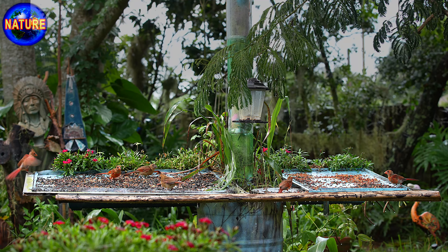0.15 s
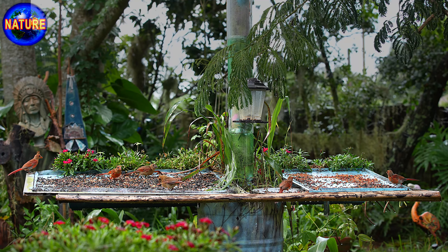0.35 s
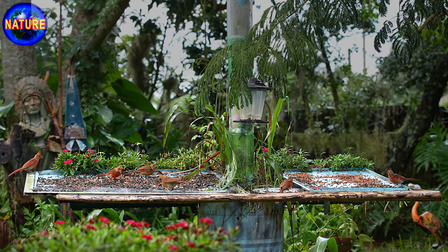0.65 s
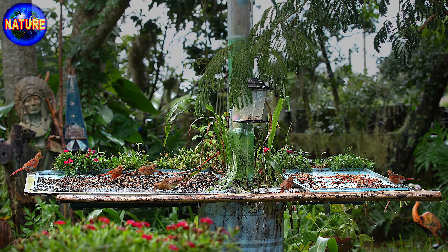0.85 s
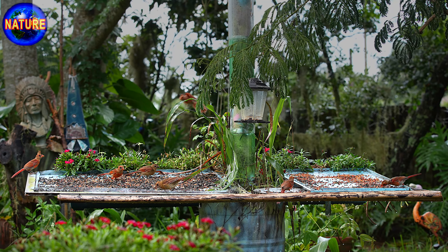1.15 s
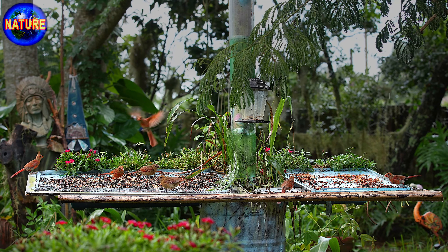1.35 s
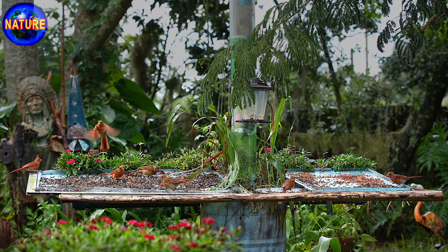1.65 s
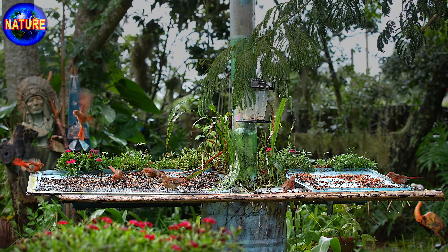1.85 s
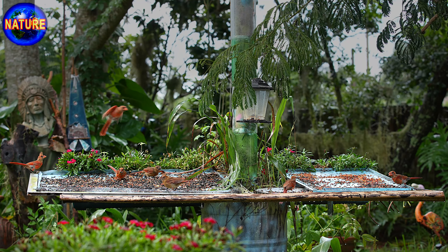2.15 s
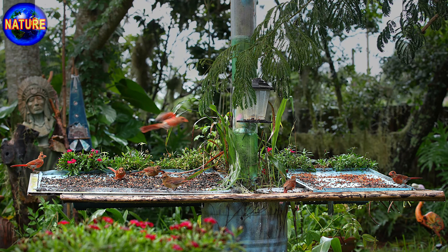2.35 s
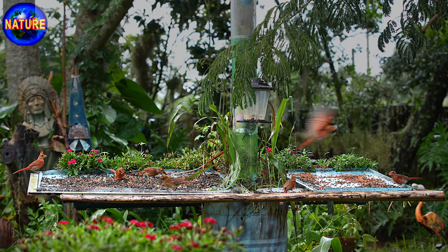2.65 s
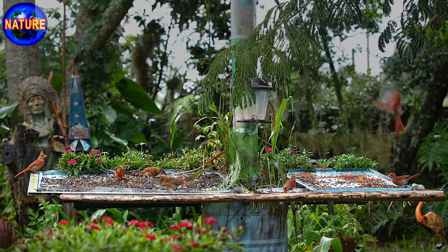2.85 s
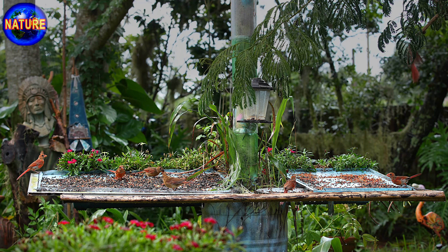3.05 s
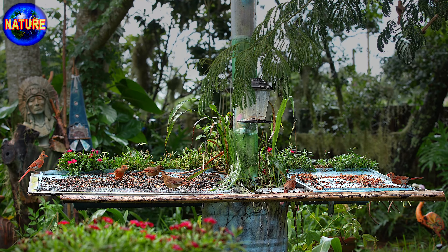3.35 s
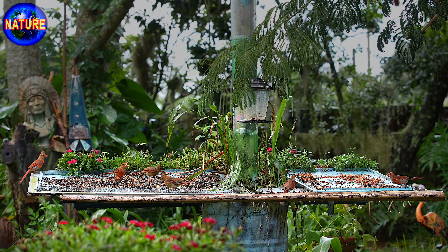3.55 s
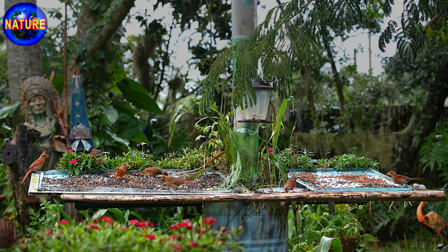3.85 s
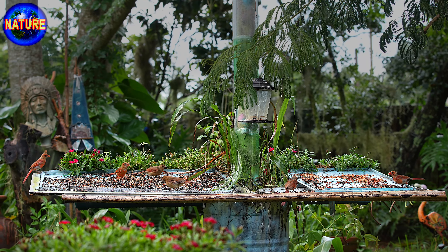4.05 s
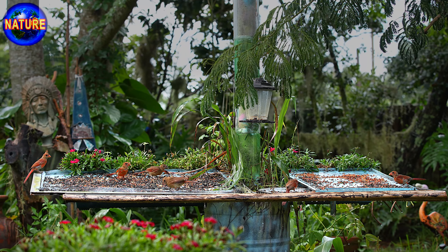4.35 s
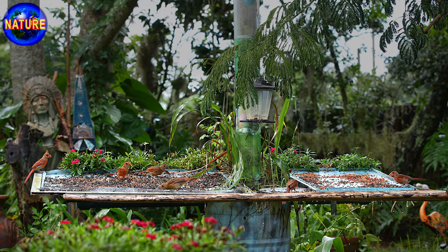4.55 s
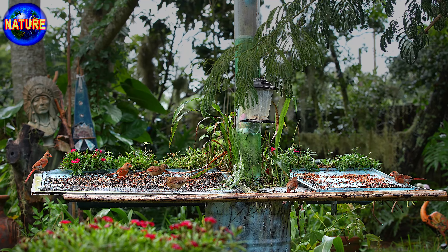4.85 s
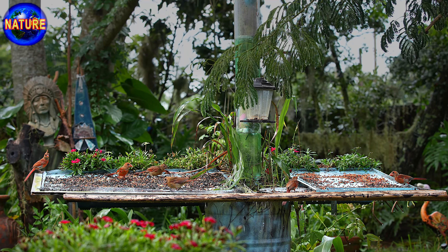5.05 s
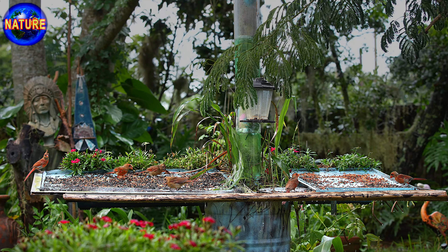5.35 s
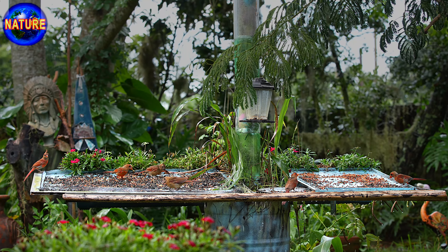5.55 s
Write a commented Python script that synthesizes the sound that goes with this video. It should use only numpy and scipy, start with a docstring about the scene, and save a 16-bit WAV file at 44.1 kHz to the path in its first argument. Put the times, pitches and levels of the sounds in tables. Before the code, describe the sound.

A stereo microphone in a leafy garden picks up constant fine dripping and a quiet hiss. A low engine throbs far off. A single bird starts with faint short whistles, grows louder with long upward sweeps, and finishes with rapid steep chips alternating with short rises, lightly echoed by trees and walls. Meanwhile the engine climbs in pitch and recedes; drips and small wind buffets remain.

```python
"""Songbird in a wet garden

A hiss of far traffic and trickling water is shaped noise; drips on leaves are noise snaps with ringing sines.
Light wind, as low noise and single swings, buffets the microphone pair.
A distant engine, a stack of sines on its firing rate, idles and then pulls away; faint hums come and go.
A songbird's gliding sines fall, rise and chip steeply; ground, trunks, walls and foliage echo them."""
import sys
import numpy as np
from scipy import signal
from scipy.fft import rfft, irfft
from scipy.io import wavfile
from scipy.ndimage import uniform_filter1d

SR = 44100
rng = np.random.default_rng(int(sys.argv[2]) if len(sys.argv) > 2 else 0)


def to_wav(sig):
    """Store sig (one row per channel, or 1-D mono) as 16-bit WAV at the path in sys.argv[1].

    Samples outside -1..1 are clipped; the rate is SR.
    """
    pcm = np.clip(np.atleast_2d(sig), -1, 1) * 32767
    pcm = np.round(pcm).astype(np.int16)
    wavfile.write(sys.argv[1], SR, pcm.T)  # frames by channels


N = 251811  # length in samples


def amp(db):
    """Turn decibels into a plain multiplier."""
    return 10 ** (np.asarray(db) / 20)


def evened(x):
    """Scale a signal to an average strength (rms) of 1."""
    return x / np.sqrt(np.mean(x ** 2) + 1e-20)


def read(points, hz):
    """Read a curve between its points, with pitch spaced as the ear hears it (log)."""
    f, value = np.transpose(points)
    return np.interp(np.log(hz + 1), np.log(f + 1), value)


def add(mix, s, sound):
    """Lay a sound into the mix at a time in seconds, cut off at the end."""
    part = mix[round(s * SR):][:len(sound)]
    part += sound[:len(part)]


def wander(top_hz):
    """Slow random drift of rms 1: noise with the changes faster than about top_hz faded out."""
    noise = rfft(rng.standard_normal(N))
    keep_slow = np.exp(-(np.fft.rfftfreq(N, 1 / SR) / top_hz) ** 2)
    return evened(irfft(noise * keep_slow, N))


# Colour of the hiss, both ports together: (frequency [Hz], relative level per Hz [dB])
HISS_COLOUR = [(18, -20), (30, -10), (58, -4.5), (110, -7.5), (220, -15), (480, -21), (1100, -23.5),
               (2000, -27.5), (3000, -27.5), (4300, -32.5), (5900, -39.5), (8000, -34.5), (10500, -32),
               (12500, -36.5), (15500, -44), (16200, -74)]
HISS_DB = -53


def hiss():
    """Far traffic and trickling water: random short-time spectra in patches; the treble flickers as a whole."""
    frames, hz = N // 128 + 5, np.fft.rfftfreq(512, 1 / SR)
    real_1, imag_1, real_2, imag_2, patches = rng.standard_normal((frames, 257, 5)).T
    flicker = evened(uniform_filter1d(rng.standard_normal(frames), 10))
    patches = uniform_filter1d(patches, 24, 0)  # wide in frequency
    patches = evened(uniform_filter1d(patches, 12, 1))  # and lasting in time
    treble = np.clip(hz / 6000, 0, 1)[:, None]
    level_db = 1.14 * patches + 1.43 * treble * flicker
    spectra = np.array([real_1 + 1j * imag_1, real_2 + 1j * imag_2]) * amp(level_db)
    noise = signal.istft(spectra, nperseg=512, noverlap=384)[1][:, :N]
    colour = amp(read(HISS_COLOUR, np.fft.rfftfreq(N, 1 / SR)))
    return amp(HISS_DB) * evened(irfft(rfft(noise) * colour, N))


# Swells of the breeze: (time [s], level added at the peak [dB], time to fade by a factor e [s])
GUST_PEAKS = [(.2, -57, .12), (1.9, -58, .4), (3.62, -46, .07), (4.97, -49, .055), (5.6, -53, .07)]
# Single buffets of wind: (time [s], peak level [dB], swing [Hz], length [s])
BUFFETS = [(2.74, -40, 38, .03), (5.55, -38, 50, .012), (5.67, -40, 45, .015), (4.937, -32, 52, .016),
           (5.001, -33, 33, .013)]
BREEZE_DB = -57.5


def wind():
    """Lumpy pressure at hearing's low edge, a little unlike at each port, and a few single swings."""
    t = np.arange(N) / SR
    band = signal.butter(N=2, Wn=[14, 32], btype="band", fs=SR, output="sos")
    rumble = evened(signal.sosfilt(band, rng.standard_normal((2, N))))
    gusts = sum(amp(db) * np.exp(-abs(t - s) / width) for s, db, width in GUST_PEAKS)
    both, apart = rumble * (amp(BREEZE_DB) + gusts)
    for s, db, hz, length in BUFFETS:
        bump = np.exp(-((t - s) / length) ** 2 / 2)
        both = both + amp(db) * bump * np.cos(2 * np.pi * hz * (t - s))
    return both + 0.21 * apart * [[1], [-1]]


# Engine over time: (time [s], firing rate [Hz], level before orders and pipe [dB])
ENGINE = [(0, 34.78, -57), (.5, 35.64, -55.5), (1.3, 35.52, -52.5), (2, 34.7, -52.5), (2.7, 35.6, -54),
          (2.879, 36.17, -64), (3.049, 41.56, -56), (3.239, 45.2, -45), (3.45, 50.4, -43),
          (3.8, 51.26, -44.5), (3.93, 52.55, -53.5), (4.2, 54.84, -47), (4.45, 55.9, -52.5),
          (4.62, 57.06, -58), (5, 59.8, -55.5), (5.3, 61.26, -53), (5.71, 63.55, -49.5)]
# Pitch of each sine (order) as a multiple of the firing rate: (order [firings])
ENGINE_ORDERS = np.array([2, 3, 4, 5, 6, 7, 8, 9]) / 2
# Strength of each order when idling: (relative level [dB])
IDLE_DB = [0.3, -12, -3, -12.5, -19, -11, -15, -11.5]
# Strength of each order under load: (relative level [dB])
PULL_DB = [3.9, -11.5, -7, -27, -21, -24.5, -32.5, -29.5]
# What the exhaust pipe boosts or weakens: (frequency [Hz], gain [dB])
PIPE = [(30, 1.8), (72, -5.5), (89, 6), (107, -11), (126, 4), (145, -14.5), (166, -2.5), (182, -14.5),
        (202, 10.5), (260, -13)]
IDLE_HZ, PULL_HZ = 36.8, 40.6  # the timbre turns from idle to load between these firing rates
LOPE_FIRINGS, LOPE_DB, LOPE_LAG = 6, 7, .33  # idle throb: firings per throb, swing each way, lag in throbs
WAVER_DB, WAVER_HZ = 1.65, 8.3  # rms and rough top speed of the waver


def engine():
    """Low exhaust orders on the firing rate through the pipe, each wavering as the air moves."""
    s, hz, db = np.transpose(ENGINE)
    t = np.arange(N) / SR
    rate, level_db = np.interp(t, s, hz), np.interp(t, s, db)
    firings = np.cumsum(rate) / SR
    load = np.clip((rate - IDLE_HZ) / (PULL_HZ - IDLE_HZ), 0, 1)
    lope = LOPE_DB * (1 - load) * np.cos(2 * np.pi * (firings / LOPE_FIRINGS - LOPE_LAG))
    out = 0
    for order, idle, pull in zip(ENGINE_ORDERS, IDLE_DB, PULL_DB):
        throb = lope * (order == 5 / 2)  # only this order throbs
        timbre_db = idle + (pull - idle) * load + read(PIPE, order * rate)
        order_db = level_db + timbre_db + throb + WAVER_DB * wander(WAVER_HZ)
        sine = np.sin(2 * np.pi * (order * firings + rng.random()))
        out = out + np.sqrt(2) * amp(order_db) * sine
    return out


def drip(snap_db, hz, ring_db, snap_hz, spray_s, spray_db):
    """A snap with a short spray behind it, and a leaf ringing a few cycles."""
    t = np.arange(4096) / SR
    spray = amp(spray_db) * np.exp(-t / max(spray_s, .002))
    burst = rng.standard_normal((2, len(t))) * (np.exp(-t / 0.00018) + spray)
    f = np.fft.rfftfreq(len(t), 1 / SR)
    colour = np.exp(-(np.log2((f + 1) / snap_hz) / 1.3) ** 2 - (f / 14000) ** 4)  # the air dulls the top
    snap = irfft(rfft(burst) * colour / np.sqrt(np.mean(colour ** 2)), len(t))
    ring = np.sin(2 * np.pi * hz * t) * np.exp(-t * hz / 2.1) * (1 - np.exp(-t / 0.000079))
    return amp(snap_db) * snap + amp(ring_db) * ring / np.std(ring[:SR // 200])


# Loud drips: (time [s], snap level [dB], snap centre [Hz], ring pitch [Hz], ring level in its first 5 ms [dB])
DRIPS = [(.073, -66, 7000, 2900, -59), (0.1476, -51, 10500, 1370, -61.5), (0.29, -46, 6930, 1780, -66),
         (0.47, -66, 6600, 4200, -66), (.52, -44, 10100, 3970, -60), (0.546, -58, 8440, 1390, -59),
         (0.5648, -46, 11000, 3320, -57.5), (.6669, -47, 8860, 4300, -66), (0.7952, -44, 7180, 1402, -76),
         (0.8132, -51, 8220, 1420, -55), (.9795, -46, 10800, 3050, -61), (.9874, -46, 8030, 3070, -51.5),
         (1.1493, -51, 9510, 1551, -77), (1.194, -49, 9190, 3170, -54), (1.208, -37, 5700, 1900, -59),
         (1.2354, -46, 8000, 1860, -66), (1.258, -51, 11500, 1940, -66), (1.359, -54, 8440, 2340, -70),
         (1.4458, -39, 7160, 1140, -76), (1.5199, -50, 9390, 3614, -63), (1.716, -39, 12000, 3530, -74),
         (1.799, -49, 10100, 3440, -64), (1.9006, -50, 10200, 3610, -71), (1.935, -50, 9610, 3810, -71),
         (2.075, -66, 8130, 1310, -58.5), (2.151, -53, 8690, 4100, -70), (2.2935, -49, 8050, 1560, -75),
         (2.4215, -53, 7050, 4080, -72), (2.4727, -42, 12300, 3830, -58), (2.7901, -55, 10800, 4700, -67),
         (2.8625, -55, 7100, 3540, -68), (2.8928, -44, 10700, 4570, -68), (3.1155, -57, 6890, 3400, -57.5),
         (3.2589, -53, 9640, 3520, -68), (3.6733, -45, 8990, 4470, -56), (3.8542, -48, 8800, 3970, -69),
         (3.9718, -45, 8600, 4100, -70), (4.12, -38, 8780, 2370, -60), (4.408, -44, 8760, 2894, -73),
         (4.455, -48, 11290, 1130, -65), (4.518, -57, 7960, 1620, -58), (4.559, -48, 9430, 1100, -70),
         (4.6555, -49, 10760, 1061, -64), (4.7686, -46, 8980, 2564, -59), (4.9733, -49, 11500, 1150, -67),
         (5.003, -44, 9500, 1049, -62), (5.0959, -42.5, 8180, 1051, -67), (5.442, -44.5, 9670, 1244, -74),
         (5.6141, -43.5, 8055, 2905, -53.5), (5.654, -56, 9720, 2874, -56), (5.6798, -52, 11370, 1652, -56)]
PATTER_PER_S, PATTER_DB = 250, -67.5
# Harder snaps leave relatively less spray: fade time, level at a usual snap, dB change per dB, usual snap
SPRAY_S, SPRAY_DB, SPRAY_SLOPE, USUAL_SNAP_DB = .018, -11.5, -.55, -48


def drips():
    """The loud drips where they fall, over a random patter of small ones of many colours."""
    patter, loud = np.zeros((2, 2, N))
    for hz in np.geomspace(2000, 13000, num=24):
        falls_now = rng.random(N) < PATTER_PER_S / 24 / SR
        size = amp(2.9 * np.minimum(rng.exponential(1, N), 3)) * falls_now
        grain = drip(0, hz / 2, -39.5, hz, rng.uniform(0.0079, 0.053), -14.5)
        patter += signal.oaconvolve(size[None], grain, axes=1)[:, :N]
    for s, snap_db, snap_hz, hz, ring_db in DRIPS:
        spray_db = SPRAY_DB + SPRAY_SLOPE * (snap_db - USUAL_SNAP_DB)
        add(loud.T, s, drip(snap_db, hz, ring_db, snap_hz, SPRAY_S, spray_db).T)
    return loud + amp(PATTER_DB) * evened(patter)


# The microphone pair:
# (frequency [Hz], left-right likeness [0 to 1], lead of right [radians], left over right [dB])
PORTS = [(30, .88, 0, 0), (150, .8, 0, 0), (330, .58, 0, -1.5), (600, .6, .3, 1.5), (950, .55, .9, -2),
         (1250, .45, -.5, -3), (1550, .65, -1, 1), (1950, .3, -1, 7), (2150, .35, 1.3, 6),
         (3000, .72, 1.9, -4), (3750, .3, 2.2, -9), (4000, .25, 4.9, -8), (4700, .42, 5, -3),
         (5900, .15, 6.8, 3), (6500, .3, 7.9, 4), (8000, .62, 8.5, 0), (10000, .68, 8.8, -3),
         (13000, .55, 9.3, -7), (16000, .35, 10, -9)]


def ports(near, other):
    """Two ports hear partly the same sound, shifted and tilted by frequency; their summed power stays."""
    f, *columns = np.transpose(PORTS)
    same, lead, tilt_db = (np.interp(np.fft.rfftfreq(N, 1 / SR), f, c) for c in columns)
    left = rfft(near)
    right = same * left * np.exp(1j * lead) + np.sqrt(1 - same ** 2) * rfft(other)
    share = 2 / (1 + amp(-2 * tilt_db))  # left's share of a total power of 2
    return irfft([left * np.sqrt(share), right * np.sqrt(2 - share)], N)


def tone(rows):
    """A sine on a pitch and level curve, with soft ends."""
    s, hz, db = np.transpose(rows)
    t = np.arange(s[0], s[-1], 1 / SR)
    pitch = uniform_filter1d(np.interp(t, s, hz), 150, mode="nearest")
    sine = np.sqrt(2) * np.sin(2 * np.pi * np.cumsum(pitch) / SR)
    soft_ends = signal.windows.tukey(len(t), min(1, 400 / len(t)))
    return s[0], amp(np.interp(t, s, db)) * sine * soft_ends


# Falling slurs: (time of top [s], fall [s], top pitch [Hz], level at top [dB], change over the fall [dB],
#                 gain into early echoes [dB], gain into late echoes [dB])
FALLS = [(1.487, 0.061, 2260, -65, -2, 2, .2), (2.165, 0.075, 2210, -55.5, -11, 1.5, .2),
         (2.905, 0.16, 2232, -52.5, -27.5, 2, .6)]
HOOK_S, HOOK_HZ, HOOK_DB = .017, 356, -16  # the hook starts this long before, far below and softer than the top
DROP_HZ, SETTLE_S = 992, .065  # the pitch sinks towards this far below the top, at this pace


def fall(top_s, fall_s, top_hz, level_db, fade_db):
    """A short hook up to the top, then a slur that sinks and flattens."""
    s = np.linspace(-HOOK_S, fall_s, num=40)
    before, after = np.maximum(-s / HOOK_S, 0), np.maximum(s, 0)
    hz = top_hz - HOOK_HZ * before - DROP_HZ * (1 - np.exp(-after / SETTLE_S))
    return np.c_[top_s + s, hz, level_db + HOOK_DB * before + fade_db * after / fall_s]


# Single echoes off ground, trunks and walls: (delay [s])
ECHO_S = [.00352, .01148, .027, .036, .05, .0555, .063, .085, .099, .118, .19]
# Their strengths before dulling, in the same order: (level [dB])
ECHO_DB = [-12, -13, -20, -18, -7.5, -12.5, -19, -21, -19, -19, -26]
# Scattered returns from foliage: (from [s], to [s], level [dB], time to fade by 60 dB [s])
FOLIAGE = [(.004, 0.099, -5.5, 0.35), (.004, 0.42, -9, 0.52)]
FAR_S = .045  # echoes from this delay on count as late


def garden(direct, near, far):
    """Single echoes, dulled by rough surfaces, and scattered returns; nearly alike at both ports."""
    t, taps = np.arange(SR // 2) / SR, np.zeros((2, SR // 2))
    for s, db in zip(ECHO_S, ECHO_DB):
        taps[:, round(s * SR)] += amp(db)
    dull = signal.butter(N=2, Wn=3300, fs=SR, output="sos")
    taps = signal.sosfiltfilt(dull, taps)
    for start, end, db, t60 in FOLIAGE:
        sparse = rng.standard_normal((2, len(t))) * (rng.random((2, len(t))) < .06)
        sparse *= (t > start) * np.clip((end - t) / 0.025, 0, 1) * amp(-60 * t / t60)
        pair = sparse[0] + 0.011 * sparse[1] * [[1], [-1]]
        taps += amp(db) * pair / np.linalg.norm(sparse[0])
    early = signal.fftconvolve(near[None], taps * (t < FAR_S), axes=1)
    late = signal.fftconvolve(far[None], taps * (t >= FAR_S), axes=1)
    return direct + (early + late)[:, :N]


# Rising slurs: (start [s], rise [s], low pitch [Hz], top pitch [Hz], bend [power], hold [s],
#                sag over the hold [Hz], change over the hold [dB], effort [dB],
#                gain into early echoes [dB], gain into late echoes [dB])
RISES = [(1.621, .148, 1936, 2506, 1.8, 0.0022, 5, -.5, -53.5, 0, 0),
         (1.767, 0.026, 2510, 3175, 0.64, 0.033, 31, -9, -45.5, -20, 0.5),
         (2.409, 0.27, 1538, 2635, 4, 0.05, 182, -24, -43.5, 1, 1),
         (3.108, 0.29, 1485, 2545, 3.5, 0.028, 77, -17, -37.5, -2, -3),
         (3.673, .041, 1770, 2795, 2.036, 0.017, 15, -8, -43, -1, -1),
         (3.855, .04, 1784, 2673, 2.07, 0.0075, 5, -12, -47, 3.5, 2)]
# How strong each pitch of a rise sounds: (pitch [Hz], gain [dB])
RISE_COLOUR = [(1470, -30.5), (1650, -22), (1790, -15), (1900, -9.5), (2100, -13), (2320, -7), (2600, 0.3),
               (2800, -10), (3180, -1.2)]
STEADY = .42  # share of a rise that climbs evenly


def rise(start, rise_s, low_hz, top_hz, bend, hold_s, sag_hz, fade_db, effort_db):
    """A slur that climbs, mostly ever faster, then holds near its top for a moment, sagging and fading."""
    s = np.linspace(0, rise_s + hold_s, num=60)
    climbed = np.minimum(s / rise_s, 1)
    held = np.clip((s - rise_s) / max(hold_s, .001), 0, 1)
    curve = STEADY * climbed + (1 - STEADY) * climbed ** bend
    hz = low_hz + (top_hz - low_hz) * curve - sag_hz * held
    return np.c_[start + s, hz, effort_db + read(RISE_COLOUR, hz) + fade_db * held ** 1.6]


# Steady hums that come and go: (from [s], to [s], middle pitch [Hz], level before the swell [dB])
HUMS = [(3.05, 3.3, 190, -62), (3.32, 4.1, 195, -60), (4.3, 4.85, 165, -61), (4.48, 4.75, 202, -59),
        (3.55, 4.5, 127, -60), (3.5, 6.6, 986, -73.5)]
HUM_WAVER_HZ = 1.2  # rms drift of the pitch


def hums():
    """Faint sine tones that swell, waver in pitch and die away."""
    out, t = np.zeros(N), np.arange(N) / SR
    for start, end, hz, db in HUMS:
        u = np.clip((t - start) / (end - start), 0, 1)
        swell = np.minimum(1, 7 * u) * (1 - u) ** 0.5
        pitch = hz + HUM_WAVER_HZ * wander(4.1)
        out += np.sqrt(2) * amp(db) * swell * np.sin(2 * np.pi * np.cumsum(pitch) / SR)
    return out


# Steep chips: (start [s], length [s], glide from [Hz], glide to [Hz], overshoot added at first [Hz],
#               overshoot decay [s], favoured pitch [Hz], level before losses [dB],
#               gain into early echoes [dB], gain into late echoes [dB])
CHIPS = [(3.558, .044, 4400, 2330, 3000, .016, 4550, -42.3, 4.5, 4),
         (3.746, .036, 5250, 2450, 2300, .003, 3950, -45, 1.5, .5),
         (3.932, .037, 5200, 2470, 2300, .003, 3950, -50.5, 3.5, 3)]
CHIP_DB_PER_OCT2 = -38  # loss in dB per squared octave away from the favoured pitch
PLUNGE_DB = -.035  # the faster the plunge, the fainter: dB per Hz/ms


def chip(start, length, high_hz, low_hz, over_hz, over_s, favoured_hz, level_db):
    """A plunge that slows to an even glide, loudest in the middle of its range."""
    s = np.linspace(0, length, num=30)
    over = over_hz * np.exp(-s / over_s)
    hz = high_hz + (low_hz - high_hz) * s / length + over
    pitch_loss_db = CHIP_DB_PER_OCT2 * np.log2(hz / favoured_hz) ** 2
    plunge_loss_db = PLUNGE_DB * over / over_s / 1000
    return np.c_[start + s, hz, level_db + pitch_loss_db + plunge_loss_db]


def scene():
    """Sing every note into the garden and add the sounds around it."""
    bird = np.zeros((3, N))  # direct sound, feed for early echoes, feed for late echoes
    for shape, table in ((fall, FALLS), (rise, RISES), (chip, CHIPS)):
        for *row, near_db, far_db in table:
            s, note = tone(shape(*row))
            add(bird.T, s, note[:, None] * amp([0, near_db, far_db]))
    return garden(*bird) + engine() + hums() + wind() + ports(*(hiss() + drips()))


EDGE_HZ = 15850


def record(dry):
    """The band limit: a steep filter removes what lies above the edge."""
    low_pass = signal.firwin(511, EDGE_HZ, window=("kaiser", 9), fs=SR)
    return signal.oaconvolve(dry, low_pass[None], "same")


dry = scene()
out = record(dry)
to_wav(out)
```